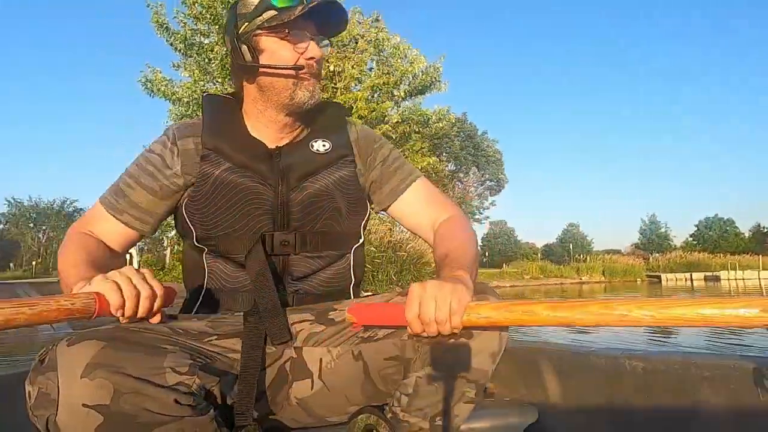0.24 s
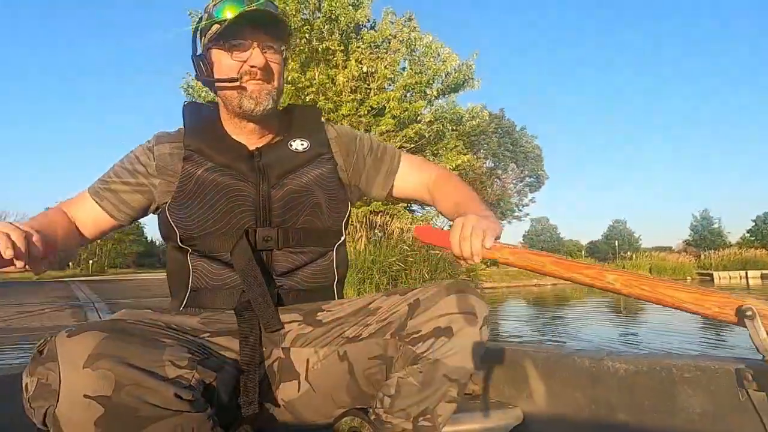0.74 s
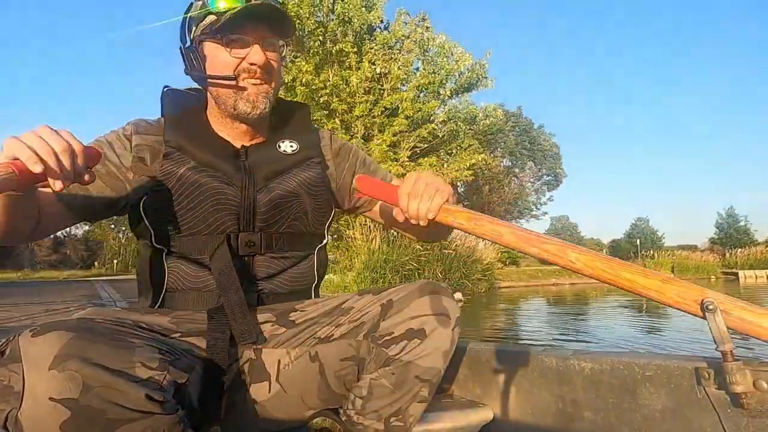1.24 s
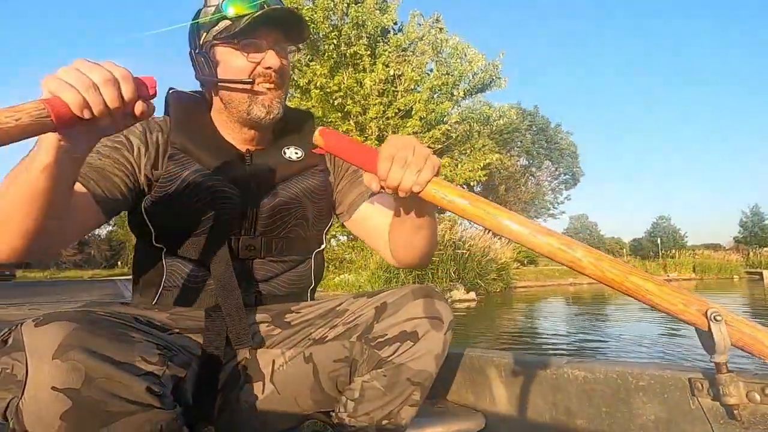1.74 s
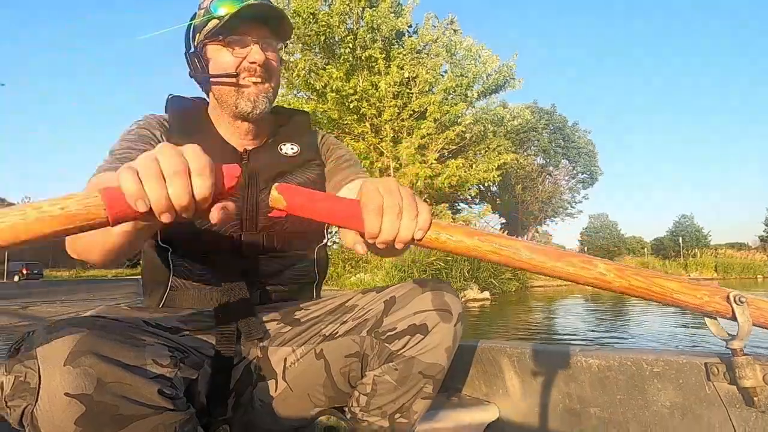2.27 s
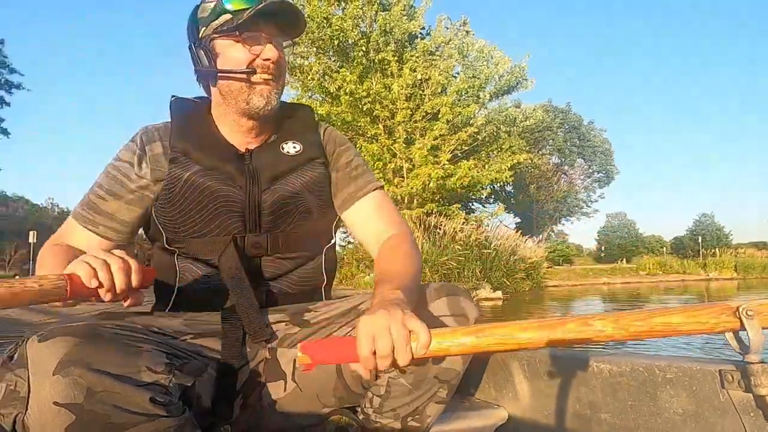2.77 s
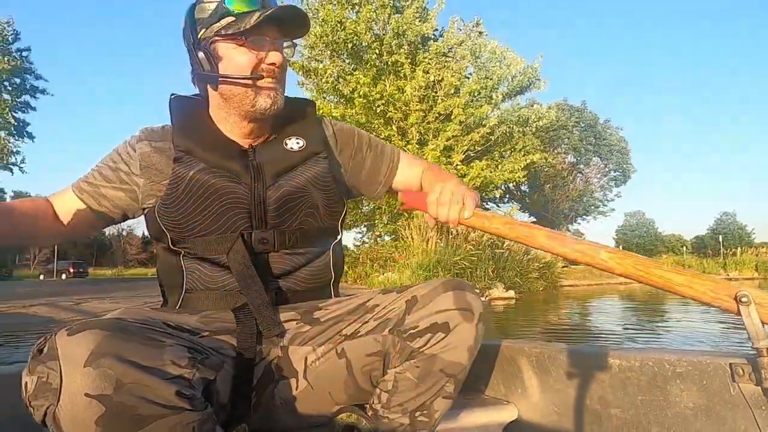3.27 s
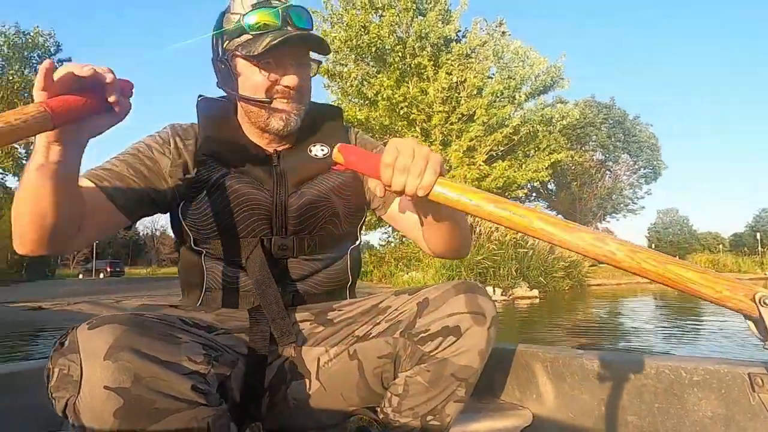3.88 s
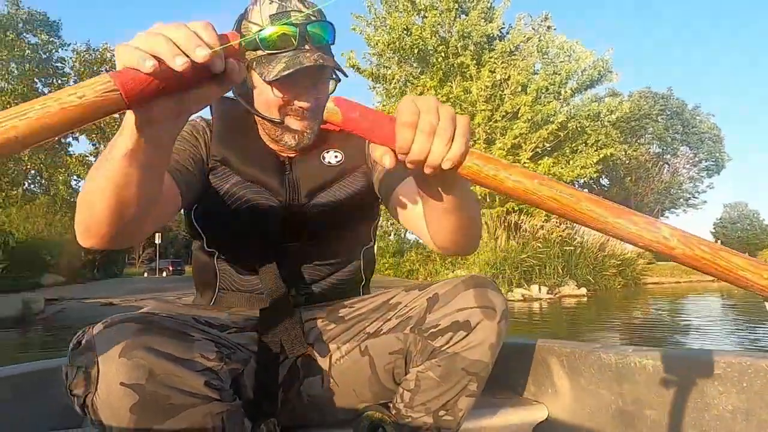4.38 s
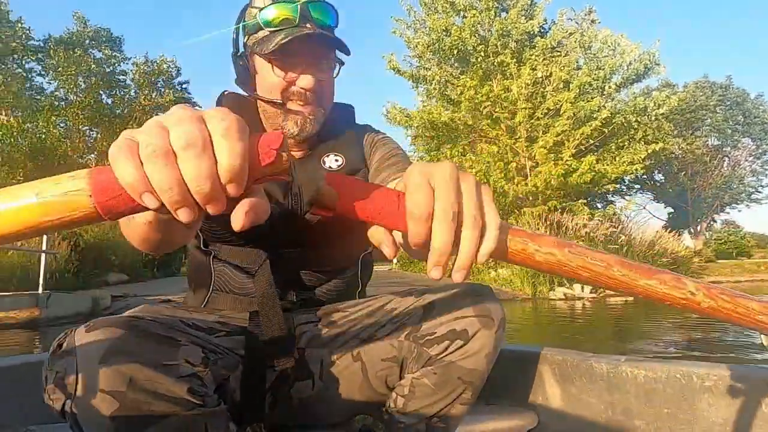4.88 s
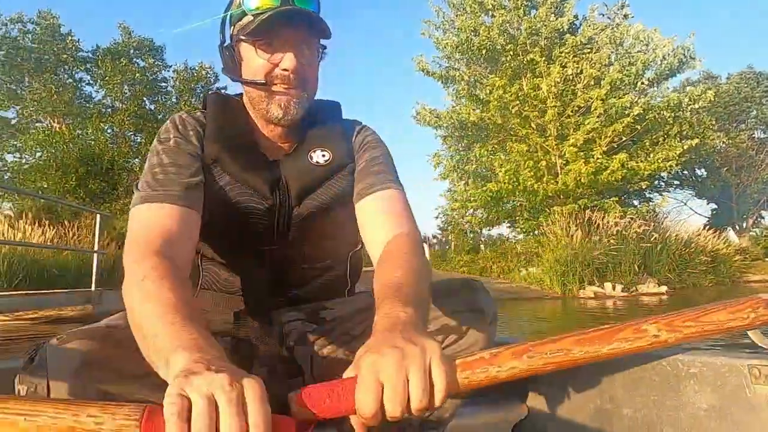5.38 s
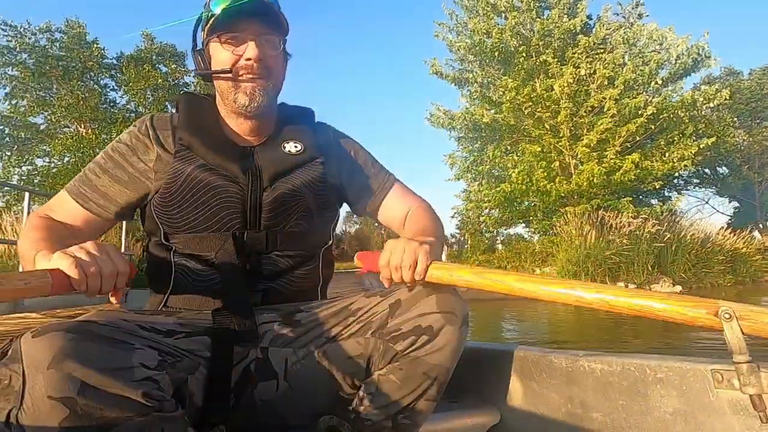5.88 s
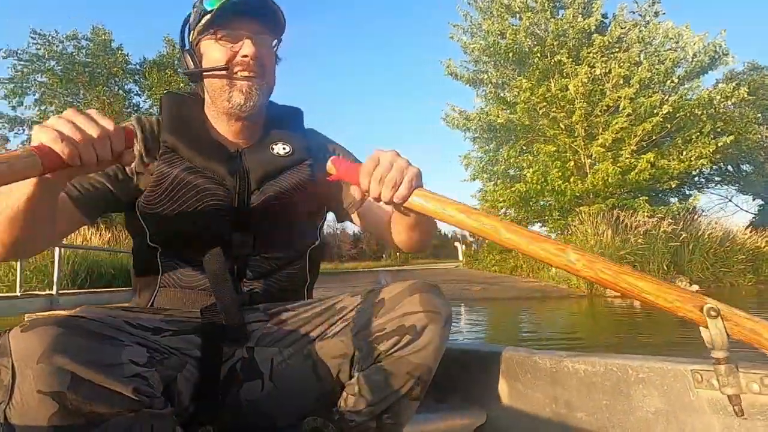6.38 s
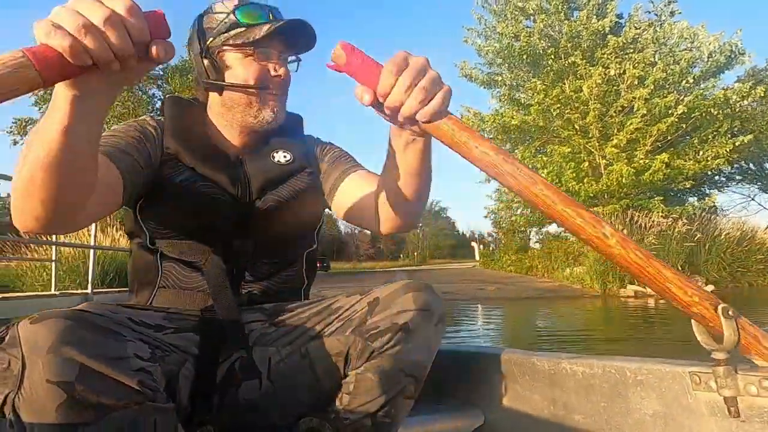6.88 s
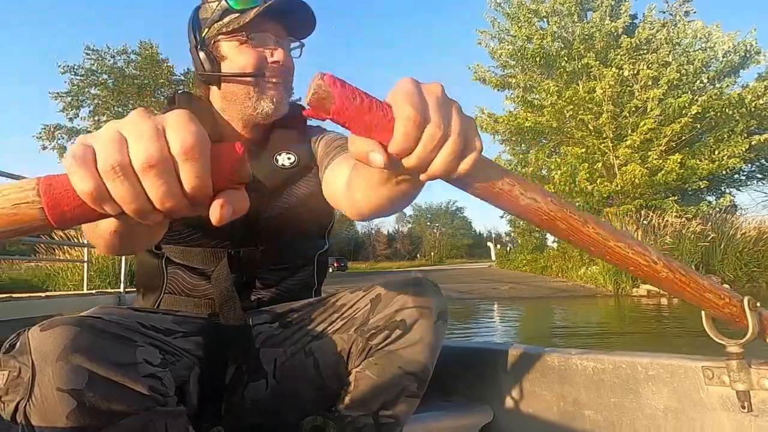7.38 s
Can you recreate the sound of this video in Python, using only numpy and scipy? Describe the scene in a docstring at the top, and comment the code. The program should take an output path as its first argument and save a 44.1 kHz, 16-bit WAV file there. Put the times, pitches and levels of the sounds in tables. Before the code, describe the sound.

Wooden oars knock and clunk in steel oarlocks as a small boat is rowed, hull booming, water washing and bubbling, a bird whistling faintly.

```python
"""On board a small boat rowed on calm water, the wooden oars work in their steel oarlocks.
Knocks excite filtered noise and decaying modes of wood and steel; loads set the hull modes booming.
Slides and a creak are runs of tiny slips. Water is shaped noise and ringing bubbles, swelling with
the strokes. A bird on the bank whistles gliding sines with a short diffuse echo."""
import sys
import numpy as np
from scipy import signal
from scipy.fft import rfft, irfft, next_fast_len
from scipy.io import wavfile
from scipy.ndimage import uniform_filter1d, map_coordinates

SR = 44100
rng = np.random.default_rng(int(sys.argv[2]) if len(sys.argv) > 2 else 0)


def wrap_up_sound(samples):
    """Save the sound to the file named by the first command line argument, as 16-bit audio."""
    columns = np.atleast_2d(samples).T
    # keep every value between -1 and 1, then stretch to whole-number steps
    tamed = np.clip(columns, -1, 1)
    steps = np.round(tamed * 32767).astype(np.int16)
    wavfile.write(sys.argv[1], SR, steps)


N = 336483  # samples
TIME = np.arange(N) / SR  # s
AGE = np.arange(SR // 3) / SR  # s since an onset

# Shaft against oarlock. Each row: start in seconds, relative levels of clack, wood and steel in dB,
# pitch of the contact in Hz, pitch of the wood in Hz, ring length as a multiple of the usual,
# side from 0 (left) to 1 (right).
KNOCKS = [(0.2730, -4.5, -4.5, -33.5, 4330, 400, 0.82, 0), (0.7329, -10.5, -12, -40, 1840, 450, 0.89, 0.19),
          (0.768, -23, -15, -36.5, 1770, 338, 0.33, 0.037),
          (0.852, -23.5, -54, -34, 1570, 362, 0.77, 0.035),
          (0.894, -37, -10.5, -47.5, 1810, 558, 1.1, 0.13),
          (0.9592, -8.5, -6.5, -36.5, 1680, 373, 0.88, 0.081),
          (0.9912, -14.5, -30, -30, 2860, 390, 0.58, 0), (1.067, -27, -11, -50.5, 1510, 667, 0.76, 0.06),
          (1.2325, -18, -19, -40, 1900, 1010, 0.7, 1), (1.239, -3.5, -7, -23, 3400, 970, 0.72, 0.72),
          (1.2973, -19.5, -10, -32, 1630, 370, 1.5, 0.11),
          (2.081, -19.5, -10.5, -32.5, 2820, 361, 0.83, 0.35),
          (2.4021, -8.5, -1.5, -28, 1600, 339, 0.76, 0), (2.4274, -20, -10.5, -30, 4200, 405, 0.54, 0),
          (2.4454, -21, -8, -30.5, 4600, 420, 0.68, 0.074), (2.461, -12, -10, -30.5, 1470, 690, 1.16, 0.71),
          (2.4677, -12, -14.5, -34, 4220, 406, 0.81, 1), (2.5027, -14, -14.5, -33, 3800, 333, 0.81, 0.63),
          (2.5198, -17.5, -15.5, -33.5, 2220, 400, 0.96, 0.44),
          (2.587, -28, -17.5, -34.5, 3170, 364, 0.54, 0.66),
          (2.826, -26.5, -23, -45, 2400, 365, 0.56, 0.14), (2.8581, -12.5, -12, -38.5, 3150, 370, 0.58, 0),
          (2.871, -11.5, -15, -38, 3140, 380, 1, 0), (2.887, -21.5, -11.5, -52, 3620, 400, 0.83, 0),
          (3.048, -21.5, -10.5, -48, 2050, 400, 0.89, 0), (3.195, -4, -8, -23, 1510, 750, 0.79, 0.51),
          (3.209, -7, -5, -32.5, 2050, 458, 1.1, 0), (3.219, -18, -19, -30, 2610, 420, 1.2, 0),
          (3.2799, -18, -19, -41, 1800, 422, 1, 0.035), (3.354, -11.5, -6, -37.5, 1590, 675, 0.94, 0.7),
          (3.3643, -7, -26, -20.5, 3250, 390, 0.74, 0.78), (3.5155, -23, -27.5, -33.5, 1800, 364, 0.83, 0),
          (3.6167, -19, -20, -45.5, 1550, 310, 0.83, 0), (3.839, -22, -29, -48, 2050, 460, 0.67, 0.046),
          (4.1491, -18.5, -28.5, -52, 2670, 1020, 1.15, 0.062), (4.2082, -25, -32, -35, 2570, 961, 1, 0),
          (4.221, -33, -50, -40, 2520, 961, 2.9, 0.064), (4.306, -20.5, -6, -41.5, 1320, 1060, 0.79, 0.035),
          (4.329, -28, -9, -43.5, 1400, 530, 1.04, 0), (4.648, -26, -15.5, -43.5, 1510, 390, 1.24, 0.04),
          (4.7751, -13, -8, -31, 1710, 322, 0.59, 0), (4.8141, -15, -11.5, -42, 2410, 348, 1.8, 0.28),
          (4.8721, -2, -9.5, -19.5, 3440, 380, 0.69, 0.81), (4.884, -10.5, -23, -26.5, 4230, 720, 2, 0.44),
          (4.896, -10.5, -16, -21, 3030, 390, 1, 1), (4.931, -18, -40, -40, 4200, 450, 0.89, 1),
          (4.952, -14, -18, -31.5, 3230, 327, 0.65, 1), (5.384, -32.5, -24, -45.5, 1690, 1040, 1.14, 0.58),
          (5.8959, -39.5, -23.5, -66, 1570, 425, 1.75, 0), (6.133, -6.5, -2, -40, 1610, 636, 0.59, 1),
          (6.176, -26, -34, -41, 3000, 400, .9, 1), (6.2489, -14.5, -12.5, -28.5, 1600, 383, 0.41, 0.12),
          (6.258, -23, -7.5, -43, 1640, 395, 0.8, 0), (6.2812, -30, -17, -39.5, 1560, 402, 0.6, 1),
          (6.294, -24, -12, -32, 1560, 365, 0.81, 0.83), (6.319, -27, -36, -32, 1660, 490, 0.67, 0.95),
          (6.6365, -35, -21.5, -36.5, 2100, 373, 1.4, 0), (7.1915, -20, -38, -28, 3620, 412, 0.74, 0.51),
          (7.423, -25, -13.5, -62, 1740, 310, 0.92, 0)]
# Modes of the oar shaft. Each row: frequency in Hz, relative level in dB, usual t60 in seconds.
SHAFT_MODES = [(1454, 7, 0.046), (1774, 2.5, 0.044), (2285, -3.5, 0.072), (2923, -2.5, 0.061),
               (3380, -9, 0.08), (4233, 3, 0.037), (4710, -8, 0.063), (5040, -22, 0.071)]


def amp(db):
    """Gain from decibels: twenty per factor of ten in amplitude."""
    return np.exp(np.asarray(db) * np.log(10) / 20)


def unit(x):
    """Normalisation of mean power: rms 1."""
    return x / np.sqrt(np.mean(x ** 2) + 1e-20)


def crest(x, size=256):
    """Normalisation of short-time power: the loudest few milliseconds have rms 1."""
    power = np.mean(np.atleast_2d(x) ** 2, axis=0)
    loudest = uniform_filter1d(power, size, mode="constant").max()
    return x / np.sqrt(loudest + 1e-20)


def along(points, hz):
    """Interpolation of (Hz, value) points on a logarithmic frequency axis."""
    f, v = np.transpose(points)
    return np.interp(np.log(hz + 1), np.log(f), v)


def favoured(hz, middle_hz, octaves):
    """Resonant emphasis: a Gaussian bell on the pitch axis, 1 at its middle."""
    return np.exp(-.5 * (np.log2((hz + 1) / middle_hz) / octaves) ** 2)


def filtered(x, response):
    """Linear filtering: the spectrum is multiplied by a response of frequency."""
    n = x.shape[-1]
    m = next_fast_len(n + 8192)
    return irfft(rfft(x, m) * response(np.fft.rfftfreq(m, 1 / SR)), m)[..., :n]


def coloured(x, spectrum, size=2048):
    """Minimum-phase filtering: a folded cepstrum gives a causal filter with this (Hz, dB) spectrum."""
    gain = amp(along(spectrum, np.fft.rfftfreq(size, 1 / SR)))
    cepstrum = irfft(np.log(gain))
    cepstrum[1:size // 2] *= 2
    cepstrum[size // 2 + 1:] = 0
    impulse = irfft(np.exp(rfft(cepstrum)))
    return signal.fftconvolve(x, impulse[None], axes=1)[:, :x.shape[1]]


def spread(pair, width):
    """Middle and side become left and right by sum and difference; width is the (Hz, dB) side gain."""
    side = filtered(pair[1], lambda hz: amp(along(width, hz)))
    return np.array([pair[0] + side, pair[0] - side])


def wobble(rate):
    """Random modulation: normal values at `rate` knots a second, joined by straight lines."""
    knots = rng.standard_normal(int(N * rate / SR) + 4)
    return map_coordinates(knots, [TIME * rate], order=1)


def add(track, s, sound):
    """Superposition: a sound is mixed in at s seconds."""
    i = max(round(s * SR), 0)
    n = max(min(sound.shape[-1], track.shape[-1] - i), 0)
    track[..., i:i + n] += sound[..., :n]


def ring(modes, scatter_db, detune, attack):
    """Modal synthesis: decaying sines, struck at random strengths for middle and side."""
    hz, db, t60 = np.transpose(modes)[:, :, None]
    age = AGE[:max(int(1.3 * t60.max() * SR), 1024)]
    luck = rng.standard_normal((4, len(modes), 1))
    phase = 2 * np.pi * (hz * (1 + detune * luck[2]) * age + luck[3])
    waves = np.sin(phase) * amp(db - 60 * age / t60)
    strengths = amp(abs(scatter_db) * luck[:2, :, 0])
    signs = [np.ones(len(modes)), np.sign(luck[1, :, 0])]
    pair = strengths * signs @ waves
    return crest(pair * (1 - np.exp(-age / attack)))


def grainy(spectrum, rate, grain):
    """Noise with random impulses, `rate` a second on average, shaped by one filter to rms 1."""
    bursts = (rng.random(N) < rate / SR) * rng.standard_normal((2, N))
    return unit(coloured(rng.standard_normal((2, N)) + grain * unit(bursts), spectrum))


def bubble(hz, cycles, rise):
    """Bubble resonance: an air pocket rings, decays and rises in pitch as it nears the surface."""
    u = AGE[:int(7 * cycles / hz * SR) + 2] * hz / cycles  # age in decay times
    phase = 2 * np.pi * cycles * (u + rise * (u - 1 + np.exp(-u)))
    return np.sin(phase) * np.exp(-u) * (1 - np.exp(-6 * u))


def bird():
    """Frequency modulation: thin gliding whistles from the bank, with a short diffuse echo."""
    # Each row: start in seconds, length in seconds, start, middle and end pitch in Hz, relative level in dB.
    slurs = [(0.005, 0.032, 3330, 3000, 2700, -43), (0.035, 0.038, 2670, 2760, 2650, -47),
             (0.062, 0.053, 2270, 2240, 2160, -46), (0.145, 0.081, 4220, 4180, 4140, -51),
             (0.382, 0.062, 3100, 3060, 3000, -30), (0.427, 0.035, 2690, 2450, 2150, -35),
             (0.487, 0.035, 2630, 2560, 2340, -34.5), (.885, 0.062, 3140, 3180, 2830, -34),
             (1.49, 0.039, 2880, 3000, 3130, -32.5), (1.539, 0.026, 2580, 2770, 2600, -27.5),
             (1.897, 0.064, 2840, 2840, 2520, -41), (1.98, .07, 3400, 3310, 3050, -49),
             (1.991, 0.087, 2470, 2600, 2450, -32.5), (2.072, 0.068, 2690, 2770, 2870, -27),
             (2.557, 0.049, 2830, 2950, 3100, -38), (2.612, 0.047, 2900, 2510, 2290, -42),
             (2.696, 0.033, 2600, 2520, 2350, -46), (2.742, 0.053, 2090, 2150, 2270, -45),
             (7.075, 0.055, 2750, 2870, 2700, -25), (7.109, 0.05, 2720, 2550, 2600, -30),
             (7.526, 0.029, 2640, 2730, 2820, -29.5), (7.546, 0.059, 2940, 3034, 2880, -28),
             (7.593, 0.029, 2730, 2620, 2480, -28)]
    song, quaver = np.zeros(N), 1 + 0.018 * wobble(300)
    for s, length, start_hz, middle_hz, end_hz, db in slurs:
        u = np.linspace(0, 1, int(length * SR))
        glide = np.polyfit([0, .5, 1], [start_hz, middle_hz, end_hz], 2)
        hz = np.polyval(glide, u) * np.interp(s + length * u, TIME, quaver)
        envelope = np.abs(np.sin(np.pi * u)) ** 0.47
        add(song, s, amp(db - 6.5) * envelope * np.sin(2 * np.pi * np.cumsum(hz) / SR))
    echo = rng.standard_normal((2, len(AGE))) * amp(-60 * AGE / 0.11)  # t60 0.11 s
    echo /= np.linalg.norm(echo[0])
    out = amp(-5) * signal.fftconvolve(song[None], echo, axes=1)[:, :N]
    out[0] += song
    return out


def bubble_cloud(count, middle_hz, limits_hz, size_db, largest, tilt, cycles, rise):
    """Superposed bubble resonances at random moments, pitches and sizes; rms 1."""
    out = np.zeros((2, N))
    starts = rng.random(count) * N / SR
    for s, (pitch, size, side) in zip(starts, rng.standard_normal((count, 3))):
        hz = np.clip(middle_hz * np.exp(.5 * pitch), *limits_hz)
        gain = amp(size_db * min(size, largest)) * (middle_hz / hz) ** tilt  # lower ones are louder
        add(out, s, gain * np.array([[1], [side]]) * bubble(hz, cycles, rise))
    return unit(out)


def burble():
    """Bubble resonance: small bubbles of many sizes ring in the wash."""
    return bubble_cloud(1500, middle_hz=1300, limits_hz=(400, 4500), size_db=4.6, largest=2,
                        tilt=1.17, cycles=12.0, rise=0.012)


def trickle():
    """Heavily damped bubble resonance: drops fall from the blades and tick on the water."""
    return bubble_cloud(900, middle_hz=2600, limits_hz=(1200, 5000), size_db=3, largest=1.0,
                        tilt=0.36, cycles=2.7, rise=0.054)


def swells(rows, rise_db_per_s, fall_db_per_s, sag_db_per_s=0):
    """Addition of powers: each (start s, end s, dB) movement rises, holds or sags, and dies away."""
    power = np.zeros(N)
    for start, end, db in rows:
        rising = rise_db_per_s * np.maximum(start - TIME, 0)
        sagging = sag_db_per_s * np.clip(TIME - start, 0, end - start)
        falling = fall_db_per_s * np.maximum(TIME - end, 0)
        power += amp(db - rising - sagging - falling) ** 2
    return power


def flow():
    """Incoherent power sums: swings, pulls and rocking add to the glide in the four water gains."""
    # The oars swing round, loading the boat and shedding water. Each row: start and end in seconds,
    # relative levels of hull, wash and spray in dB.
    swings = [(-0, 0.095, -27, -48, -78), (0.368, 0.523, -22.5, -40, -52), (0.554, 0.828, -17, -40, -50),
              (0.943, 1.286, -14.5, -34, -49.5), (2.456, 2.587, -17.5, -42.5, -57.5),
              (2.901, 3.21, -22, -42.5, -56), (3.282, 3.546, -15.5, -35, -54.5),
              (4.79, 4.99, -14.5, -34, -60), (5.05, 5.16, -27.5, -59, -64.5),
              (5.226, 5.445, -31.5, -72, -74), (5.492, 5.795, -29, -57, -59), (6.07, 6.32, -19, -39, -52.5),
              (6.392, 6.706, -23.5, -39.5, -53), (7.018, 7.088, -25, -45, -50.5),
              (7.41, 7.642, -18.5, -37.5, -49)]
    # Rows for hull, wash and spray. Each row: rise and fall in dB per second.
    swing_slopes = [(221, 115.5), (111, 103.5), (110, 104)]
    # The blades pull through the water. Each row: catch and finish in seconds,
    # relative levels of hull, wash and spray in dB.
    pulls = [(1.25, 1.995, -32.5, -36, -59), (3.837, 4.46, -35.5, -38.5, -53.5),
             (6.404, 7.128, -35.5, -40, -65.5)]
    # The boat rocks as the weight shifts. Each row: start and end in seconds, relative level in dB.
    rocks = [(0.45, 1.33, -27), (1.82, 2.1, -29.5), (2.39, 2.48, -20), (2.6, 2.7, -28), (3.22, 3.6, -25.5),
             (4.35, 4.39, -18.5), (4.55, 5.0, -25.5), (6.05, 6.7, -32), (7.07, 7.12, -20.5),
             (7.37, 7.45, -15), (7.45, 7.63, -27.5)]
    # The hiss dips briefly as the oars pause: middle in seconds, half width to 1/e in seconds, depth in dB.
    middle_s, width_s, lull_db = (5.295, 0.061, -7.5)

    start, end, *levels = np.transpose(swings)
    swing = np.array([swells(zip(start, end, db), rise, fall)
                      for db, (rise, fall) in zip(levels, swing_slopes)])
    catch, finish, *levels = np.transpose(pulls)
    pull = np.array([swells(zip(catch, finish, db), rise_db_per_s=54, fall_db_per_s=45.5, sag_db_per_s=7)
                     for db in levels])
    rock = swells(rocks, rise_db_per_s=183, fall_db_per_s=71)
    glide = amp([[-31], [-47.5], [-59], [-35.5]]) ** 2  # hull, wash, spray, heave
    drumming, washing, spraying, heaving = np.sqrt(glide + np.vstack([swing + pull, rock]))
    lull = amp(lull_db * np.exp(-((TIME - middle_s) / width_s) ** 2))
    return drumming, washing * lull, spraying * lull, heaving


def water():
    """Turbulence as shaped noise: water drums on the hull, washes round the blades and sprays off them."""
    # Spectra of hull drumming, slow heave, wash and spray. Each row: frequency in Hz, relative level in dB.
    rumble_spectrum = [(40, -25.5), (62, -3.5), (85, -1), (100, 2), (118, 0.5), (135, 0), (170, -2),
                       (215, -4.5), (270, -8.5), (310, -15.5), (380, -13), (520, -23), (680, -26.5),
                       (1200, -58.5), (3000, -120)]
    sway_spectrum = [(12, -8), (25, -10), (36, 19), (48, 6.5), (65, 9.5), (110, -30.5), (400, -120)]
    wash_spectrum = [(300, -29.5), (520, 12.5), (800, 2), (1100, 6.5), (1800, -1), (3000, -2.5),
                     (4200, -13.5), (6000, -73.5), (10000, -89.5)]
    spray_spectrum = [(2800, 3.5), (4200, 9), (6000, 1.5), (8700, -2), (9800, -9), (12500, -14.5),
                      (15500, -29)]
    drumming, washing, spraying, heaving = flow()
    rumble = unit(coloured(rng.standard_normal((2, N)), rumble_spectrum))
    rumble *= drumming * amp(0.6 + 3.64 * wobble(16))
    heave = unit(filtered(rng.standard_normal((2, N)), lambda hz: amp(along(sway_spectrum, hz))))
    heave *= heaving * amp(-1.5)
    lapping = wobble(40)
    hiss = amp(-4.5 + 2.2 * lapping) * grainy(wash_spectrum, rate=140, grain=0.5)
    wash = washing * (hiss + amp(-3.0) * burble())
    spray = spraying * amp(-2.0 + 1.1 * lapping + 2.0 * wobble(90))
    spray = spray * grainy(spray_spectrum, rate=240, grain=0.3)
    return rumble + heave + wash + spray + washing * amp(-16.5) * trickle()


def plops(count=9, follow_s=0.016):
    """Bubble resonance: a trapped air pocket rings, then more strongly damped bubbles, higher and lower."""
    # The blades trap pockets of air. Each row: start in seconds, pitch in Hz, relative level in dB,
    # relative level of the followers in dB.
    pockets = [(0.133, 2040, -29, -29), (1.582, 768, -18.5, -28), (1.592, 980, -22, -19.5),
               (1.624, 1550, -31, -23), (1.665, 1065, -17.5, -23.5), (1.908, 1214, -37, -25),
               (2.145, 1350, -24, -31), (3.961, 600, -24, -24), (3.987, 1360, -19, -30),
               (3.995, 705, -22.5, -29), (4.628, 1035, -15.5, -20), (5.379, 1056, -25, -41),
               (5.436, 1415, -26, -22), (5.484, 3340, -33, -39), (6.523, 665, -13.5, -24.5),
               (6.576, 956, -22.5, -21.5), (6.588, 3550, -26, -27), (6.722, 757, -24, -24)]
    out = np.zeros((2, N))
    for s, hz, db, follower_db in pockets:
        add(out[0], s, amp(db - 2.5) * bubble(hz, cycles=8.5, rise=0.025))
        for late, pitch, side in rng.standard_normal((count, 3)):
            follower = bubble(hz * np.exp(0.36 * np.tanh(pitch)), cycles=4.2, rise=0.015)
            add(out, s + follow_s * abs(late), amp(follower_db - 5.5) * np.array([[1], [side]]) * follower)
    return out


def hull(favour_db=8, boom_db=6):
    """Modal excitation: an oar's load sets the hull panels booming; every knock stirs them too."""
    # The heaviest loads. Each row: start in seconds, relative level in dB, most favoured frequency in Hz.
    thuds = [(0.275, -3.5, 340), (0.892, 4.5, 174), (0.925, -4.5, 134), (1.062, 0, 76), (2.076, -3, 166),
             (2.372, 0.5, 121.5), (2.398, 0, 197), (2.84, -3.5, 155), (2.969, 0.5, 187), (3.196, 0.5, 191),
             (3.351, -1, 164), (4.304, -4, 185), (4.35, -12, 83), (4.715, -2, 134), (4.775, 5, 140),
             (4.811, -4.5, 176), (5.23, -12, 243), (5.395, -12.5, 212), (5.901, -7.5, 167),
             (6.134, -0.5, 173), (6.241, 0, 120), (6.315, -1, 107), (6.547, 1, 155), (7.375, 1.5, 118),
             (7.402, 0.5, 106)]
    # Each row: mode frequency in Hz, relative level in dB, t60 in seconds.
    panel_modes = [(63.6, -1, 0.19), (86.9, 0.5, 0.24), (119, -4, 0.49), (138.7, 2.5, 0.17), (168, -1, 0.3),
                   (216.2, -0.5, 0.37), (242.2, -2.5, 0.24), (280.8, -6, 0.3), (329.3, -7.5, 0.44),
                   (369.6, -7, 0.18)]
    out = np.zeros((2, N))
    hz, level, t60 = np.transpose(panel_modes)
    for s, db, middle_hz in thuds:
        modes = np.transpose([hz, level + favour_db * favoured(hz, middle_hz, octaves=0.42), t60])
        add(out, s, amp(db - 9.0) * ring(modes, scatter_db=3.0, detune=0.02, attack=0.0016))
    for s, _, wood_db, *_ in KNOCKS:
        boom = ring(panel_modes, scatter_db=1.0, detune=0.029, attack=0.004)
        add(out, s, amp(wood_db + boom_db - 11.0) * boom)
    return out


def groans(waver=0.028):
    """Sustained oscillation: as an oar judders under load, a hull panel swells into a wavering hum."""
    # Each row: start in seconds, length in seconds, pitch in Hz before wavering, relative level in dB.
    hums = [(0.665, 0.09, 92.5, -14.5), (0.785, 0.075, 116.7, -13), (0.953, 0.1, 100, -5.5),
            (4.405, 0.086, 144.4, -19.5), (7.44, 0.075, 123, -13.5), (7.572, 0.065, 230.4, -13.5)]
    out, bend = np.zeros((2, N)), 1 + waver * wobble(40)
    for s, length, hz, db in hums:
        span = slice(int(s * SR), int((s + length) * SR))
        hum = np.sin(2 * np.pi * np.cumsum(hz * bend[span]) / SR)
        add(out[0], s, amp(db + 0.5) * hum * signal.windows.tukey(len(hum), .5))
    return out


def creak(slip_hz=180, uneven=0.15):
    """Stick-slip friction: a shaft slips in its lock in an uneven run of short noise bursts."""
    # Each row: time in seconds, relative level in dB.
    contour = [(6.0667, -32.5), (6.09, -32.5), (6.128, -29.5)]
    # Each row: frequency in Hz, relative level in dB.
    slip_spectrum = [(400, -37), (1000, 10), (2600, 5.5), (5000, -7), (9000, -13), (13000, -31)]
    s, db = np.transpose(contour)
    gaps = np.exp(uneven * rng.standard_normal(40)) / slip_hz  # one gap per slip
    times = s[0] + np.cumsum(gaps) - gaps[0]
    out = np.zeros((2, N))
    for at, noise in zip(times, rng.standard_normal((len(times), 2, 512))):
        if at < s[-1]:
            slip = noise * np.exp(-AGE[:noise.shape[1]] / 0.0026)
            add(out, at, amp(np.interp(at, s, db)) * slip)
    return amp(8.0) * coloured(out, slip_spectrum)


def scrapes(favour_db=6, sing_db=5.0):
    """Friction noise: wood grinds over steel in tiny slips, each slide in its own resonant band."""
    # Each row: start in seconds, length in seconds, relative level in dB at start and at end, band in Hz.
    slides = [(0.967, 0.02, -28, -25.5, 2000), (1.227, 0.11, -23, -34, 2030),
              (2.327, 0.07, -40.5, -24, 2400), (2.414, 0.13, -21, -40, 4200),
              (3.176, 0.096, -34, -31, 2560), (4.661, 0.125, -40, -22, 2600),
              (4.775, 0.21, -27.5, -27.5, 2390), (6.243, 0.098, -30, -30, 1590),
              (7.475, 0.23, -59, -31, 4000)]
    # Each row: frequency in Hz, relative level in dB.
    grit_spectrum = [(600, -69), (1400, 10.5), (2400, 3.5), (3000, 2.5), (3500, 2.5), (4300, -1.5),
                     (5500, -4.5), (7200, -11), (8700, -12.5), (9800, -26), (12000, -23), (15500, -54.5)]
    out = np.zeros((2, N))
    grit = amp(3.0 * wobble(260)) * grainy(grit_spectrum, rate=720, grain=0.27)

    def sing(hz):
        """Resonance: the slips keep the shaft modes ringing."""
        return sum(favoured(hz, mode_hz, octaves=0.03) for mode_hz, *_ in SHAFT_MODES)

    for s, length, start_db, end_db, band_hz in slides:
        slide = grit[:, int(s * SR):int((s + length) * SR)]
        slide = unit(filtered(slide, lambda hz: amp(
            favour_db * favoured(hz, band_hz, octaves=0.14) + sing_db * sing(hz))))
        size = slide.shape[1]
        fade = amp(np.linspace(start_db, end_db, size) - 7.5)
        add(out, s, slide * fade * signal.windows.tukey(size, .15))
    return out


def pins():
    """Impulsive release: an oarlock pin catches as it turns and lets go with a small dry tick."""
    # Each row: start in seconds, relative level in dB.
    catches = [(0.5345, -30.5), (0.551, -30.5), (0.568, -35.5), (0.601, -33.5), (0.642, -30.5),
               (0.684, -29), (0.8827, -29), (0.9128, -27), (2.392, -23), (2.8428, -36), (4.399, -39),
               (4.443, -42), (4.505, -46.5), (4.57, -42), (5.0623, -45), (5.1145, -37.5), (5.207, -42.5),
               (5.357, -43.5), (6.475, -36), (6.492, -36.5), (7.367, -32.5), (7.4906, -34), (7.515, -33),
               (7.541, -41)]
    # Each row: frequency in Hz, relative level in dB.
    pin_spectrum = [(400, -40.5), (900, 9.5), (1700, 4.5), (2900, -1.5), (4300, -7), (6000, -13),
                    (8700, -17), (12000, -33), (15500, -42.5)]
    out = np.zeros((2, N))
    for (s, db), noise in zip(catches, rng.standard_normal((len(catches), 2, 2048))):
        decay = amp(-60 * AGE[:noise.shape[1]] / 0.04)  # t60 0.04 s
        add(out, s, amp(db - 2.5) * crest(coloured(noise * decay, pin_spectrum)))
    return out


def oarlocks():
    """Free modal decay: an unloaded steel fork swings free and rings on for a moment."""
    # Each row: start in seconds, relative levels of the low and the high ring in dB.
    free_rings = [(1.24, -11.5, -29.5), (1.279, -20, -27.5), (2.403, -25, -46), (2.568, -25, -47),
                  (4.87, -20, -26), (6.246, -20.5, -22), (6.316, -24, -23.5)]
    # Low and high modes of the fork. Each row: frequency in Hz, relative level in dB, t60 in seconds.
    low_modes = [(1000, -14.5, 0.092), (1051, 13.5, 0.095), (1120, -6.5, 0.12), (1430, -23, 0.11),
                 (2853, -32, .08), (3370, -21.5, 0.091), (4000, -13, 0.059)]
    high_modes = [(4970, -7, 0.038), (6560, -12, .05), (7760, -13.5, 0.054), (8450, -5, 0.046),
                  (9000, -17, 0.057), (8670, -3, 0.039), (10900, -7.5, 0.05), (11200, -18, 0.04),
                  (11700, -6, 0.058), (12000, -7.5, 0.037), (12440, -23, .06), (12700, -14, .06)]
    out = np.zeros((2, N))
    for s, low_db, high_db in free_rings:
        add(out, s, amp(low_db - 4.5) * ring(low_modes, scatter_db=7.5, detune=0.024, attack=0.0012))
        add(out, s, amp(high_db - 13.5) * ring(high_modes, scatter_db=4, detune=0.0033, attack=0.0014))
    return out


def from_lock(blow, side):
    """Level and time differences place each lock; the level difference is greatest near 1800 Hz."""
    # Each row: frequency in Hz, gain of the side signal in dB.
    lock_width = [(300, -21.5), (700, -8), (2000, -7.5), (4200, -6.5), (8000, -3)]
    share = np.clip(side, 0, 1)
    # for the left and the right lock: left channel over right, and how much later it hears
    pan_db = np.interp(share, [0, 1], [5.5, 0.2])
    lag_s = np.interp(share, [0, 1], [0.00001, 0.000062])
    channels = np.array([[1], [-1]])

    def placing(hz):
        """Interaural differences: half of each goes to either channel."""
        shade = along([(400, 0.45), (1800, 1.0), (4500, 0.79), (9000, 0.4)], hz)
        return amp(channels * pan_db / 2 * shade) * np.exp(-1j * np.pi * hz * lag_s * channels)

    return filtered(spread(blow, lock_width), placing)


def knocks(favour_db=8, contact_db=8, glint_db=-9.5):
    """Impact excitation: each contact is a crack and a dense ring of shaft and lock; the lows last longest."""
    # Spectra of wood tone, clack, steel tick and steel glint. Each row: frequency in Hz, relative level in dB.
    wood_spectrum = [(150, -58), (280, -16), (360, 2), (480, 2.5), (660, 0), (800, -3), (990, -2.5),
                     (1300, -12), (1650, -15), (2600, -40), (7000, -97.5)]
    clack_spectrum = [(500, -59), (1000, 2), (1500, 2), (1800, 5.5), (2300, 7), (3100, 5), (3600, 1),
                      (4250, 1.5), (5000, -3.5), (6000, -36), (8000, -39.5), (13000, -99.5)]
    tick_spectrum = [(2000, -105), (4300, -24), (5600, 12.5), (7400, 0.5), (7800, 2), (8100, -3.5),
                     (8800, 4.5), (9500, -16), (11000, -24.5), (15000, -57)]
    glint_spectrum = [(5000, -73.5), (9000, -0.5), (10400, -1.5), (10900, -9.5), (11300, -1), (11650, -5),
                      (12500, -3), (13500, -9), (15500, -21)]
    # Damping of the noise. Each row: frequency in Hz, usual t60 in seconds.
    damping = [(300, 0.39), (700, 0.26), (1500, 0.17), (3000, 0.072), (5000, 0.046), (12000, 0.062)]
    # Bending of the oar. Each row: mode frequency in Hz, relative level in dB, usual t60 in seconds.
    bending_modes = [(385, -1, .11), (496, 1, 0.11), (574, -2.5, .08), (723, 1.5, 0.089), (995, -4, 0.18),
                     (1140, -13.5, 0.079), (1328, -7.5, .12)]

    out = np.zeros((2, N))
    bands, t, z = signal.stft(rng.standard_normal((len(KNOCKS), 2, SR // 4)), SR, nperseg=128)
    lengths = np.array([length for *_, length, side in KNOCKS])
    t60 = along(damping, bands)[:, None] * lengths[:, None, None, None]
    tails = signal.istft(z * amp(-60 * t / t60), SR, nperseg=128)[1]
    age = np.arange(tails.shape[-1]) / SR
    crack = (1 - np.exp(-age / 0.00045)) * (1 + 0.35 * np.exp(-age / 0.00059))
    swell = 1 - np.exp(-age / 0.0003)  # onset of the wood tone
    hz = np.geomspace(100, SR / 2, 300)
    mode_hz, mode_db, mode_t60 = np.transpose(SHAFT_MODES)
    bend_hz, bend_db, bend_t60 = np.transpose(bending_modes)
    for (s, clack_db, wood_db, steel_db, contact_hz, wood_hz, length, side), tail in zip(KNOCKS, tails):
        # the spot that is struck brings out its own part of the wood tone, the clack and the modes
        tone = np.transpose([hz, along(wood_spectrum, hz) + favour_db * favoured(hz, wood_hz, octaves=0.12)])
        blow = amp(wood_db - 9.5) * crest(coloured(tail * swell, tone))
        contact = contact_db * favoured(hz, contact_hz, octaves=0.25)
        colour = np.transpose([hz, along(clack_spectrum, hz) + contact])
        blow += amp(clack_db - 11.5) * crest(coloured(tail * crack, colour))
        blow += amp(steel_db - 7.5) * crest(coloured(tail * crack, tick_spectrum))
        blow += amp(steel_db + glint_db - 10.0) * crest(coloured(tail * crack, glint_spectrum))
        struck_db = mode_db + 12 * favoured(mode_hz, contact_hz, octaves=0.53)
        modes = np.transpose([mode_hz, struck_db, mode_t60 * length])
        add(blow, 0, amp(clack_db - 15) * ring(modes, scatter_db=3, detune=0.005, attack=0.0003))
        bent_db = bend_db + 11 * favoured(bend_hz, wood_hz, octaves=0.22)
        bending = np.transpose([bend_hz, bent_db, bend_t60 * length])
        add(blow, 0, amp(wood_db - 11.5) * ring(bending, scatter_db=2, detune=0.015, attack=0.0008))
        add(out, s, from_lock(blow, side))
    return out


def scene():
    """Superposition: the locks on either hand, all else around the rower, a little louder and later on the left."""
    # Each row: frequency in Hz, gain of the side signal in dB.
    width = [(40, -12), (180, -20.5), (350, -15), (700, -7.5), (1500, -7), (3000, -4), (6000, -4.5),
             (10000, 1.5)]
    left_lag_s = 0.00003
    background = bird() + water() + plops()
    boat = hull() + groans() + creak() + scrapes() + pins() + oarlocks()
    pair = spread(background + boat, width) * amp([[.6], [-.6]])
    signs = np.array([[-1], [1]])
    return knocks() + filtered(pair, lambda hz: np.exp(1j * np.pi * hz * left_lag_s * signs))


def record(dry, top_hz=15900):
    """Clipping and band limiting: peaks stop at full scale, then nothing is kept from top_hz up."""
    clipped = np.clip(dry, -1, 1)
    return filtered(clipped, lambda hz: hz < top_hz)


dry = scene()
out = record(dry)
wrap_up_sound(out)
```